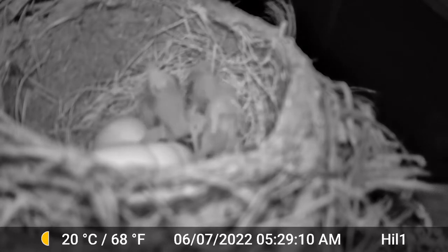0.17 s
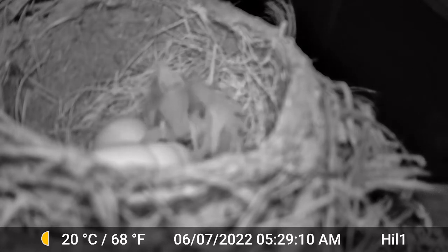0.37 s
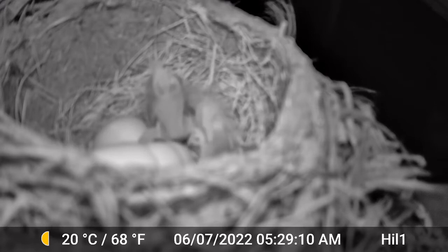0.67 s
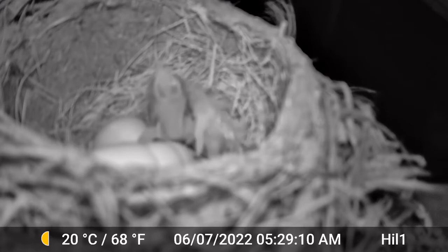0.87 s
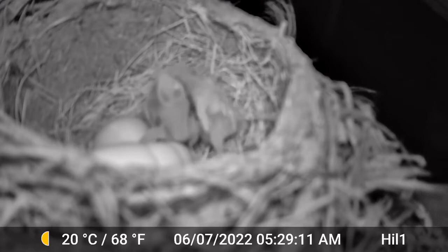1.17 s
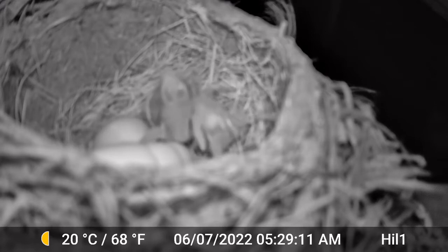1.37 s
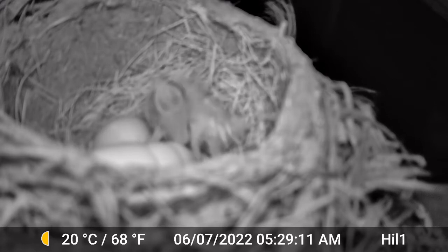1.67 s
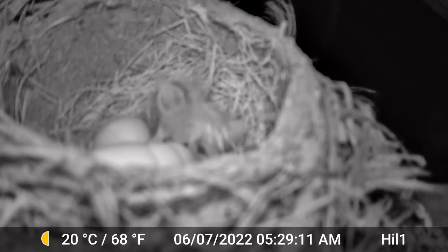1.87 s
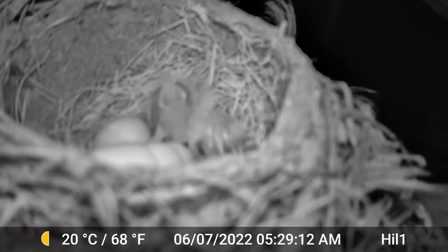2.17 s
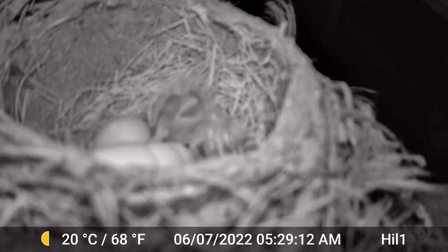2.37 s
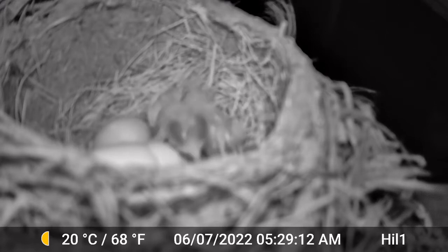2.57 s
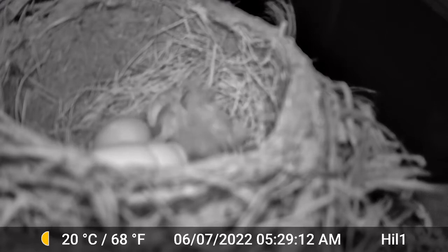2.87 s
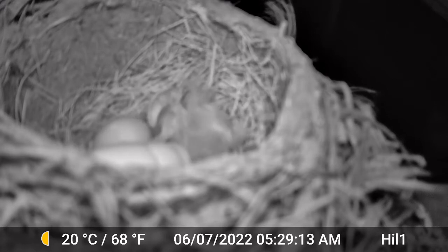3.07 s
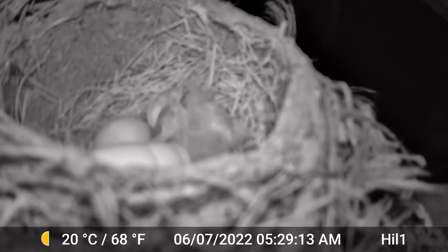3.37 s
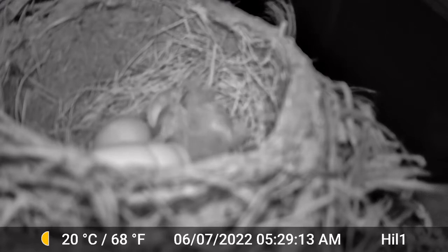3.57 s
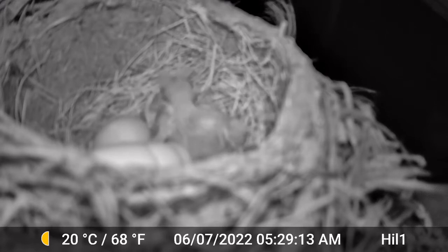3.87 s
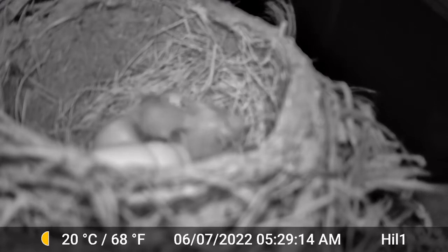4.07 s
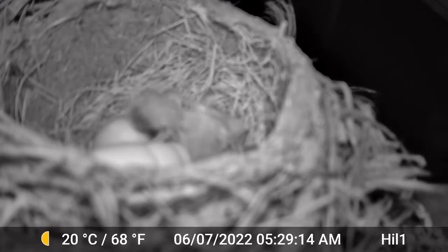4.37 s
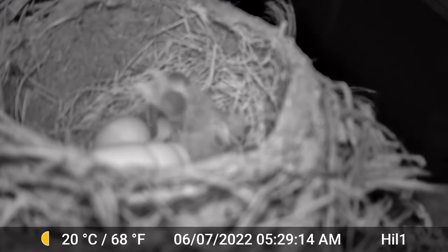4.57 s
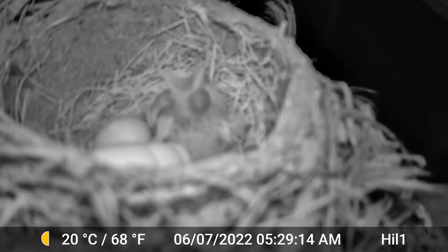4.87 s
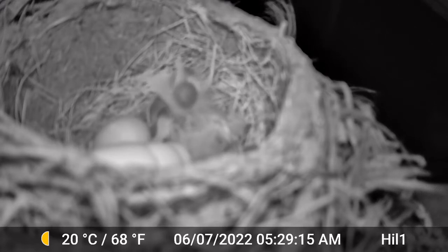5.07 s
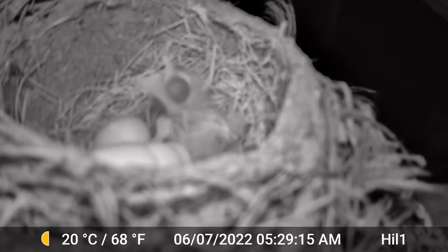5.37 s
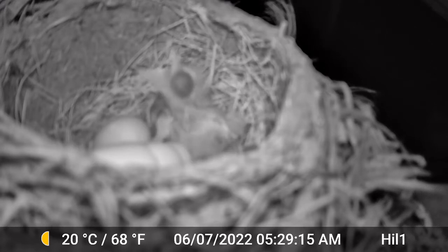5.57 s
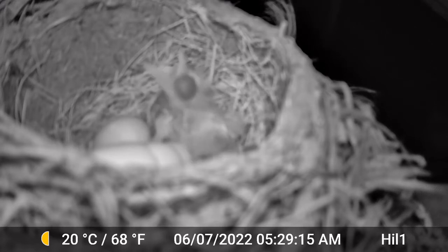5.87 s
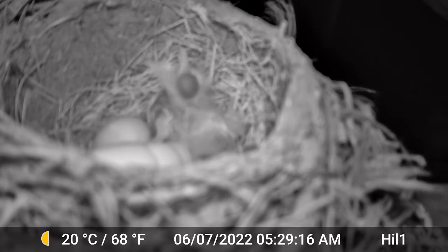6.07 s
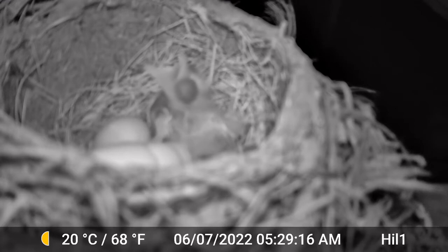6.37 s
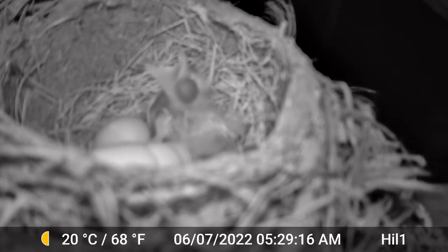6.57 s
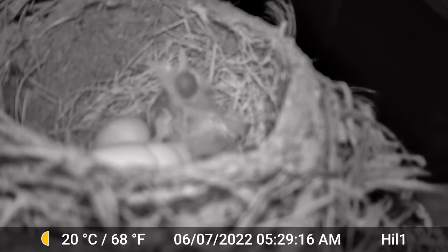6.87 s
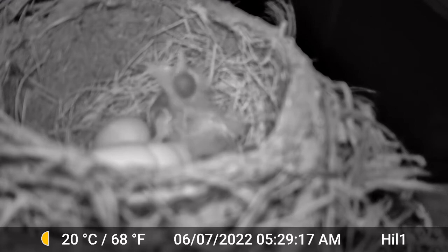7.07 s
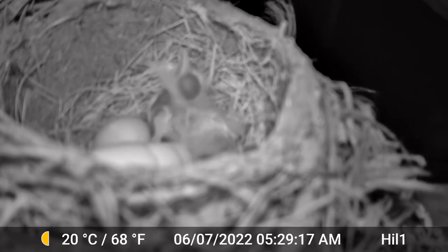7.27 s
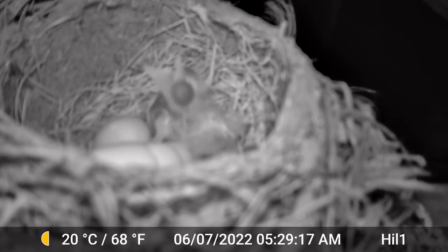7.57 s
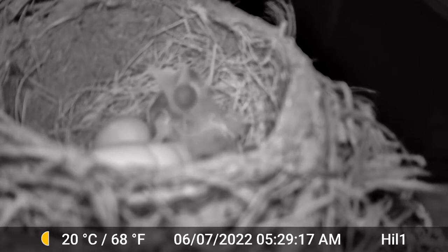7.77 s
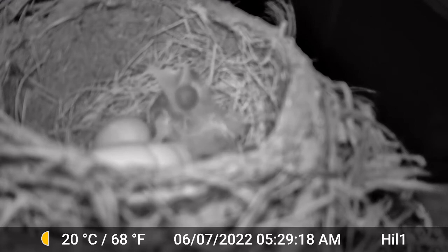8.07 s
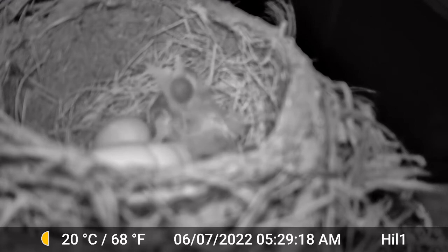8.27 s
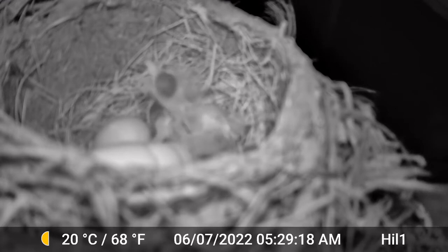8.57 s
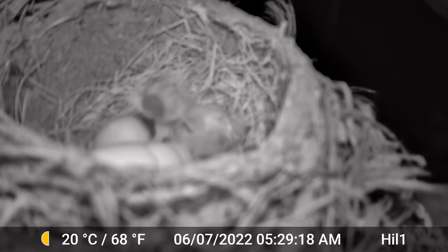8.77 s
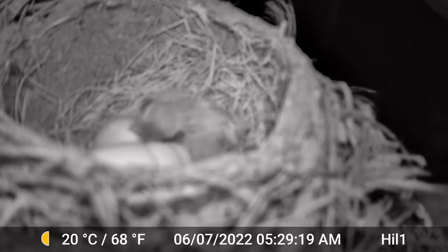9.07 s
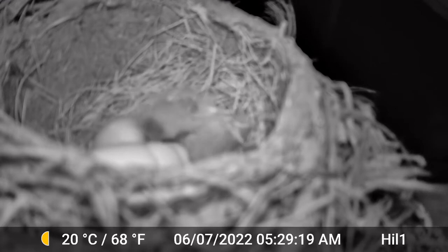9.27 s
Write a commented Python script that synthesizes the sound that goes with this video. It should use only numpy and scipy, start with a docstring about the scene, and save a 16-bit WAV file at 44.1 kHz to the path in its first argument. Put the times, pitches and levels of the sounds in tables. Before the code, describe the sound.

Outdoors at dawn, a microphone close to a nest picks up thin arched chick peeps spaced a second or more apart. A songbird nearby whistles fast slurred phrases for the first four seconds, with a brief scratchy twitter and nasal whine, each note ringing among trees. It pauses, then returns briefly around seven seconds, followed by a softer bird. Distant traffic rumbles steadily below.

```python
"""Distant traffic rumbles under the faint blur of a dawn chorus, both made of shaped noise.
Nest straw ticks now and then as short rings; birds far off answer in echoing glides.
A nestling peeps thinly, close to a nest camera, in arched tones with an octave above.
An adult songbird whistles slurred phrases, twitters and whines, and the trees ring after each note.
Late on, a softer bird sings close by with little echo."""
import sys
import numpy as np
from scipy import signal
from scipy.fft import rfft, irfft, next_fast_len
from scipy.io import wavfile
from scipy.ndimage import uniform_filter1d, map_coordinates

SR = 44100
rng = np.random.default_rng(int(sys.argv[2]) if len(sys.argv) > 2 else 0)


def store_pcm(level_fs):
    """Save levels as 16-bit WAV."""
    pcm = np.round(np.clip(level_fs, -1, 1) * 32767).astype(np.int16)
    wavfile.write(sys.argv[1], SR, np.atleast_2d(pcm).T)


N = 415422  # length of the scene in samples


def amp(db):
    """Turn decibels into a gain."""
    return 10 ** (np.asarray(db) / 20)


def unit(x):
    """Scale x to an rms of 1."""
    return x / np.sqrt(np.mean(x ** 2) + 1e-20)


def along(points, hz):
    """Read a curve of (Hz, value) points on a log frequency axis."""
    point_hz, value = np.transpose(points)
    return np.interp(np.log(hz + 1), np.log(point_hz + 1), value)


def wobble(rate, size):
    """Draw a smooth random curve through `rate` random knots a second."""
    knots = rng.standard_normal(int(size * rate / SR) + 4)
    return map_coordinates(knots, [np.arange(size) * rate / SR])


def filtered(x, response):
    """Multiply the spectrum of x by a response that depends on frequency."""
    padded = next_fast_len(N + SR // 2)
    hz = np.fft.rfftfreq(padded, 1 / SR)
    return irfft(rfft(x, padded) * response(hz), padded)[:N]


def noise(spectrum):
    """Colour white noise by a spectrum in dB, then scale it to an rms of 1."""
    white = rng.standard_normal(N)
    return unit(filtered(white, lambda hz: amp(along(spectrum, hz))))


def add(track, s, sound):
    """Mix a sound into the track at time s, in seconds."""
    part = track[max(round(s * SR), 0):][:len(sound)]
    part += sound[:len(part)]


def fade(size, edge):
    """A gate that opens and closes softly within `edge` seconds."""
    t = np.arange(size) / SR
    to_nearest_end = np.minimum(t, t[-1] - t)
    return np.sin(np.pi / 2 * np.clip(to_nearest_end / edge, 0, 1)) ** 2


def throbs(hz, length):
    """Now and then the rumble swells for a few cycles near its strongest pitch."""
    # swells of the rumble: time_s (a third of the way in), level_db (before a 0.5 dB lift)
    swells = [(2.525, -22), (4.848, -22.5), (5.994, -22), (6.668, -22), (8.987, -20)]
    track, t = np.zeros(N), np.arange(int(length * SR)) / SR
    chances = rng.uniform(-1.02, 1, (len(swells), 2))
    for (s, db), (detune, phase) in zip(swells, chances):
        throb_hz = hz * (1 + 0.098 * detune)
        tone = np.sin(2 * np.pi * throb_hz * t + np.pi * phase)
        add(track, s - length / 3, amp(db + 0.5) * np.hanning(len(t)) * tone)
    return track


def traffic():
    """Engines rumble, drone and hum far away under the even roar of tyres."""
    # noise colours, only their shape counts: pitch_hz, density_db (per Hz)
    rumble_shape = [(15, -21.5), (30, -14.5), (55, -1), (72, -1.5), (91, 2), (106, -3), (135, -11),
                    (250, -61)]
    drone_shape = [(85, -26), (120, -1.5), (141, 1), (155, -6), (172, 1), (210, -11), (255, -11),
                   (330, -25), (500, -72.5)]
    roar_shape = [(180, -22.5), (300, 2.5), (370, -2.5), (420, 3.5), (500, -4.5), (590, -0.5), (800, -4.5),
                  (1200, -13), (1500, -23), (2200, -33.5), (4000, -57.5)]
    # slow course of the drone: time_s, level_db (before a 0.5 dB cut)
    drone_course = [(0, -36.5), (5.8, -38), (7.3, -35.5)]
    # steady engine tones: pitch_hz, level_db (before the random drift)
    hum_tones = [(91, -39), (141, -44.5), (254, -55.5), (580, -60)]
    t = np.arange(N) / SR
    rumble = amp(-35.0 + 2.0 * wobble(12, N)) * noise(rumble_shape)
    rumble += throbs(hz=92.3, length=0.0944)
    hum = np.zeros(N)
    for hz, db in hum_tones:
        # each tone fades and drifts on its long way here
        drift = wobble(14, N) + 1j * wobble(14, N)
        hum += amp(db) * np.real(drift * np.exp(2j * np.pi * hz * t))
    drone_db = np.interp(t, *np.transpose(drone_course))
    drone = amp(drone_db - 0.5) * noise(drone_shape)
    roar = amp(-44.0) * noise(roar_shape)
    return rumble + hum + drone + roar


def air():
    """The blur of the far dawn chorus, fading into faint hiss towards the treble."""
    # noise colour, only its shape counts: pitch_hz, density_db (per Hz)
    blur_shape = [(1200, -21.5), (1900, -8.5), (2500, 5), (3200, 1.5), (3900, -2), (5000, -13.5),
                  (8000, -18)]
    return amp(-60.0 + wobble(4.6, N)) * noise(blur_shape)


def straw():
    """Dry stalks snap softly as the chicks shift, each with its own broad ring."""
    # snaps of straw: start_s, level_db (before a 1.5 dB lift and the random ring), ring_hz
    snap_list = [(0.145, -42, 5670), (1.1966, -44.5, 7100), (4.008, -42.5, 5760)]
    snaps, t = np.zeros(N), np.arange(SR // 10) / SR
    for s, db, hz in snap_list:
        # random strength from moment to moment broadens the ring
        ring = wobble(1400, len(t)) * np.sin(2 * np.pi * hz * t)
        decay = amp(db + 1.5 - 60 * t / 0.049)  # 60 dB down after 0.049 s
        add(snaps, s, decay * (1 - np.exp(-t / .001)) * ring)
    return snaps


def whistles(notes, partials, waver, flutter_db):
    """A syrinx (a bird's voice box) glides through each note: held tones are clean, fast slurs rough."""
    track = np.zeros(N)
    for s, hz, db in notes:
        pitch = uniform_filter1d(hz, size=180)
        slur_speed = np.abs(np.gradient(pitch)) * SR  # Hz per second
        strain = np.tanh(slur_speed / 12000)
        shaky_pitch = pitch * (1 + waver * (0.098 + strain) * wobble(500, len(hz)))
        phase = 2 * np.pi * np.cumsum(shaky_pitch) / SR
        flutter = flutter_db * (0.67 + strain) * wobble(166, len(hz))
        level = amp(db + flutter) * fade(len(hz), edge=0.0034)
        # overtones swell with the strain, and the throat lets more of them through on low notes
        open_db = 6.5 * np.log10(strain + .005) + np.interp(pitch, [2100, 2800], [17, 0])
        tone = np.zeros(len(hz))
        for multiple, partial_db in partials:
            gain = amp(partial_db + (multiple > 1) * open_db)
            tone += gain * np.sin(round(multiple) * phase)
        add(track, s, np.sqrt(2) * level * tone)
    return track


def trees(x, delay, build):
    """Trunks and leaves scatter the sound back: the echo builds up, then dies, sooner in the treble."""
    # how long the echo rings: pitch_hz, time_to_fall_60_db_s
    ring_times = [(3000, 0.64), (8000, 0.36)]
    hz, t, grains = signal.stft(rng.standard_normal(SR), SR, nperseg=256)
    decay = amp(-60 * t / along(ring_times, hz)[:, None])
    grains = grains * decay * (1 - np.exp(-t / build))
    tail = signal.istft(grains, SR, nperseg=256)[1]
    tail = np.pad(tail / np.linalg.norm(tail), (int(delay * SR), 0))
    return signal.fftconvolve(x, tail)[:N]


def glide(s, length, start_hz, end_hz, db):
    """A straight slide that swells and fades: (start s, pitch Hz, level dB)."""
    u = np.linspace(-1, 1, int(length * SR))
    level_db = db - 4.5 * (u ** 2 - .5)  # the ends lie 4.5 dB below the middle
    return s, np.linspace(start_hz, end_hz, len(u)), level_db


def far_birds():
    """Distant whistles arrive fluttering and half drowned in their echo."""
    # plain glides: start_s, length_s, start_hz, end_hz, level_db (before the echo mix)
    far_notes = [ (0.19, 0.14, 3260, 3220, -53), (0.449, 0.078, 2900, 2544, -54.5),
                 (0.982, .07, 3636, 3440, -48.5), (2.19, 0.071, 3250, 3630, -59),
                 (2.831, 0.084, 3384, 3035, -46), (4.42, 0.044, 4550, 4810, -53),
                 (5.34, 0.032, 2210, 2110, -56), (5.427, 0.063, 3300, 3020, -54),
                 (5.521, 0.052, 2295, 2090, -55), (5.857, 0.05, 3470, 2920, -49),
                 (6.526, 0.068, 2520, 2620, -55.5), (6.573, 0.041, 3160, 2940, -48),
                 (6.986, 0.11, 3563, 3455, -45.5), (7.114, 0.062, 2266, 2040, -51.5),
                 (7.682, 0.07, 2960, 3034, -53), (8.83, 0.037, 2726, 2980, -47),
                 (8.969, 0.054, 3260, 3610, -51), (9.001, 0.12, 3430, 3305, -51.5),
                 (9.035, 0.065, 3110, 2600, -50.5), (9.12, 0.08, 3210, 2920, -54.5), ]
    notes = [glide(*note) for note in far_notes]
    voice = whistles(notes, [(1, 0.0026)], waver=.04, flutter_db=5)
    return amp(-3.5) * voice + amp(-3.5) * trees(voice, delay=0.001813, build=0.002)


def nestling():
    """Each peep arches up and falls; most get a push on the way down, and a slight rasp rides on it."""
    # peeps: start_s, length_s, top_hz, arch_depth (0-1), level_db (before the push and the octave),
    # octave_db (at the peep's end, against its main tone), push_db (late swell, or dip if negative)
    peep_list = [ (.706, .064, 2770, .35, -41, -1, -8), (1.708, .083, 3340, 1, -28.5, -5, 1),
                 (4.315, .062, 3250, .9, -30, -14, 7), (5.789, .076, 3440, .92, -31, -13.5, 11),
                 (7.377, .082, 3460, 1, -31, -13, 12), (8.822, .096, 3440, 1, -30, -12.5, 11), ]
    push_at, push_width = .8, 0.099  # shares of a peep's length
    brighten_db = 6.5  # the octave gains this much over a peep
    track = np.zeros(N)
    for s, length, top_hz, depth, db, octave_db, push_db in peep_list:
        u = np.linspace(0, 1, int(length * SR))
        # the pitch tops out early and ends lower than it began
        sag = np.where(u < .38, 1.2, .86) * (u - .38) ** 2
        swell_db = push_db * np.exp(-((u - push_at) / push_width) ** 2)
        phase = 2 * np.pi * np.cumsum(top_hz * (1 - depth * sag)) / SR
        octave = amp(octave_db + brighten_db * (u - 1.0)) * np.sin(2 * phase)
        tone = np.sin(phase) + octave
        rasp = 1 + 0.06 * u * wobble(1800, len(u))
        level = np.sqrt(2) * amp(db + swell_db) * fade(len(u), edge=0.0065)
        add(track, s, level * tone * rasp)
    return track + amp(-24) * trees(track, delay=0.0016, build=.002)


def slur(s, first_s, second_s, start_hz, turn_hz, end_hz, turn_db, end_db):
    """A note swells and slides to a turning point, then eases to its end: (start s, pitch Hz, level dB)."""
    onset_db = -11.5  # a note starts this far below its level at the turn
    settle = 2.4  # time constants within the second part: steep at first, then level
    length = first_s + second_s
    t = np.arange(int(length * SR)) / SR
    settled = np.expm1(-settle * np.maximum(t - first_s, 0) / second_s) / np.expm1(-settle)
    hz = np.interp(t, [0, first_s], [start_hz, turn_hz]) + (end_hz - turn_hz) * settled
    level_db = np.interp(t, [0, first_s, length], [turn_db + onset_db, turn_db, end_db])
    return s, hz, level_db


def trill():
    """The pitch zigzags at a steady rate above the twitter: (start s, pitch Hz, level dB)."""
    start_s, length_s, level_db = 2.317, 0.11, -44.5  # level before the echo mix
    centre_hz, swing_hz, zigzags_per_s = 7360, 1140, 18
    t = np.arange(int(length_s * SR)) / SR
    zigzag = signal.sawtooth(2 * np.pi * zigzags_per_s * t, .5)
    return start_s, centre_hz + swing_hz * zigzag, level_db


def walls(x, count):
    """A few near surfaces send back distinct copies, which beat against a gliding note."""
    echoes = np.zeros(N)
    delays_s = np.linspace(.004, .036, count) * rng.uniform(0.98, 1.0, count)
    for delay in delays_s:
        add(echoes, delay, x)
    return echoes / np.sqrt(count)


def adult():
    """Nearly pure whistles, a scratchy twitter and a whine, with the surroundings ringing behind."""
    # whistled notes: start_s, first_part_s, second_part_s, start_hz, turn_hz, end_hz,
    # turn_db, end_db (levels before the echo mix)
    song_notes = [ (.803, 0.061, 0.049, 2230, 2460, 2620, -27.5, -30),
                  (.89, 0.037, 0.029, 2550, 2780, 2496, -30.5, -29.5),
                  (.958, 0.0069, 0.11, 2400, 2240, 2002, -32.5, -41),
                  (1.274, 0.026, 0.016, 2985, 3474, 3540, -28.5, -18.5),
                  (1.314, 0.0038, 0.022, 3150, 3080, 2786, -23.5, -26),
                  (1.334, 0.018, 0.013, 2800, 2540, 2466, -21.5, -25.5),
                  (1.365, 0.013, 0.021, 2590, 3006, 2765, -20.5, -31.5),
                  (1.398, 0.026, 0.01, 1860, 1800, 1890, -41.5, -40),
                  (1.441, 0.011, 0.039, 2200, 2362, 2332, -31.5, -29.5),
                  (1.487, .006, .08, 2840, 2865, 2852, -27, -24),
                  (1.818, 0.014, .005, 2980, 3480, 3360, -30, -32.5),
                  (1.833, 0.0049, 0.049, 3000, 2824, 2630, -26, -26),
                  (1.878, 0.015, 0.046, 2680, 3196, 2095, -20, -41.5),
                  (1.96, 0.027, 0.048, 2186, 2513, 2034, -27, -45),
                  (2.987, 0.018, 0.043, 2967, 3050, 3100, -23.5, -23),
                  (3.056, .012, 0.022, 4080, 3520, 3156, -19.5, -19),
                  (3.089, 0.0045, 0.0095, 3060, 2770, 1900, -32.5, -48.5),
                  (3.108, 0.041, 0.015, 1730, 1964, 2020, -38, -32),
                  (3.15, 0.05, 0.028, 2013, 2350, 2360, -24.5, -36),
                  (3.53, 0.025, 0.01, 3110, 3270, 3360, -28, -31),
                  (3.554, 0.012, 0.047, 2475, 3574, 3650, -23.5, -27.5),
                  (3.612, .014, 0.045, 3680, 2970, 2490, -22.5, -26.5),
                  (3.685, 0.044, 0.019, 2230, 2320, 2400, -30, -21),
                  (3.737, 0.019, 0.061, 2344, 2710, 2185, -23.5, -37),
                  (4.1, 0.037, 0.014, 2880, 2770, 2790, -26.5, -26),
                  (4.143, 0.017, 0.017, 2792, 3120, 3360, -16, -26.5),
                  (4.16, 0.0085, 0.016, 3300, 3480, 3290, -19.5, -20),
                  (4.178, .008, 0.027, 3357, 3600, 3330, -24.5, -19),
                  (4.208, 0.019, 0.046, 3550, 3180, 2820, -22.5, -26.5),
                  (4.268, 0.011, 0.07, 2766, 2800, 2794, -21.5, -18.5),
                  (7.147, 0.009, 0.033, 3200, 2850, 2733, -29, -30),
                  (7.188, 0.019, 0.03, 2760, 3163, 2250, -24.5, -32.5),
                  (7.278, 0.025, 0.029, 2450, 2497, 2100, -26, -40), ]
    # two falling strokes, a chip between them and a thin held top note; columns as in song_notes
    twitter_notes = [ (2.274, 0.023, .014, 6920, 4550, 3850, -32, -35),
                     (2.315, .02, .025, 2960, 3240, 3160, -40.5, -43.5),
                     (2.346, 0.017, 0.028, 4700, 4160, 3760, -27.5, -42),
                     (2.48, 0.08, .05, 7400, 7500, 7480, -46, -57), ]
    # one nasal whine, columns as in song_notes (levels before a 12 dB cut)
    whine_note = (2.47, .11, .07, 1035, 1110, 1115, -41, -50)
    # overtones of the whine: multiple of its pitch, level_db (before the strain and throat change it)
    whine_partials = [(2, -10), (3, -1), (6, -15), (8, -5.5)]
    song = [slur(*note) for note in song_notes]
    twitter = [slur(*note) for note in twitter_notes] + [trill()]
    voice = whistles(song, [(1, 1.0), (2, -34.0)], waver=0.022, flutter_db=1)
    voice += whistles(twitter, [(1, 0.0021)], waver=.05, flutter_db=0)
    voice += amp(-12.0) * whistles([slur(*whine_note)], whine_partials, waver=.015, flutter_db=6)
    near_echo = amp(-6.0) * walls(voice, count=6)
    tree_echo = amp(-7.0) * trees(voice, delay=.012, build=0.0034)
    return amp(-2.0) * voice + near_echo + tree_echo


def neighbour():
    """A soft singer close by, so with little echo."""
    # notes: start_s, first_part_s, second_part_s, start_hz, turn_hz, end_hz, turn_db, end_db
    soft_notes = [ (7.497, 0.043, 0.014, 3250, 3590, 3440, -47.5, -53),
                  (7.569, 0.027, 0.035, 2905, 2830, 2600, -42, -51.5),
                  (8.181, 0.0085, 0.089, 3140, 2870, 2280, -45.5, -46),
                  (8.289, 0.024, 0.0083, 2280, 2880, 2880, -43.5, -48),
                  (8.318, 0.022, 0.026, 2390, 2980, 2850, -44.5, -48.5), ]
    notes = [slur(*note) for note in soft_notes]
    voice = whistles(notes, [(1, 0.0065)], waver=0.032, flutter_db=3)
    return voice + amp(-12) * trees(voice, delay=0.011, build=.007)


def scene():
    """Add all sources at the one microphone."""
    background = traffic() + air()
    birds = far_birds() + nestling() + adult() + neighbour()
    return (background + straw() + birds)[None]


def record(dry):
    """The camera rolls off the treble and keeps nothing above its band limit."""
    knee_hz, top_hz = 7700, 8900
    return filtered(dry[0], lambda hz: (hz < top_hz) / np.sqrt(1 + (hz / knee_hz) ** 36))[None]


dry = scene()
out = record(dry)
store_pcm(out)
```